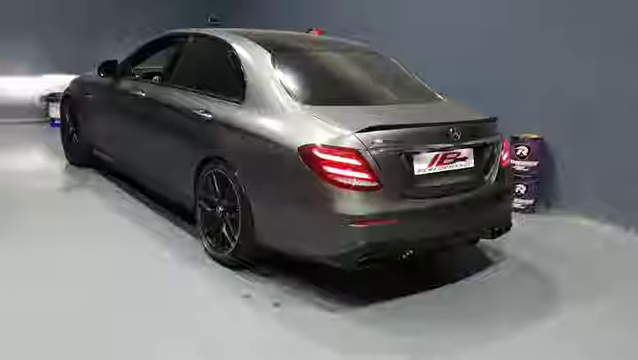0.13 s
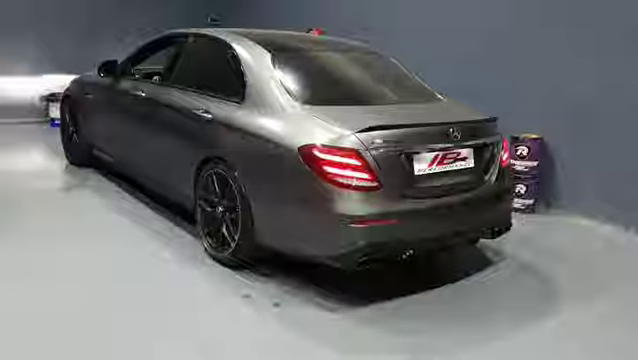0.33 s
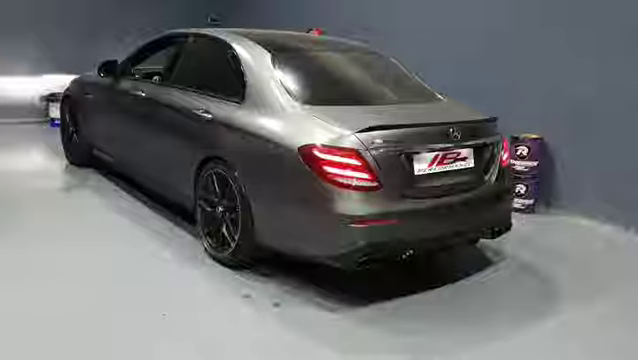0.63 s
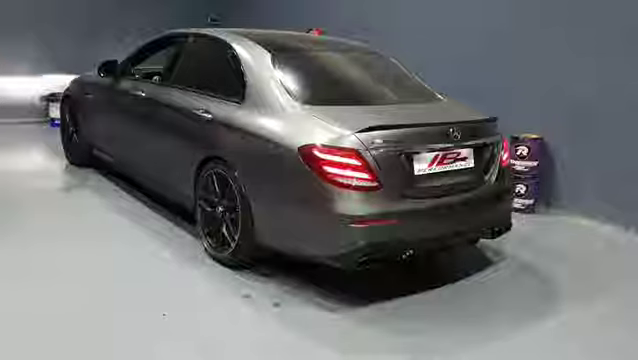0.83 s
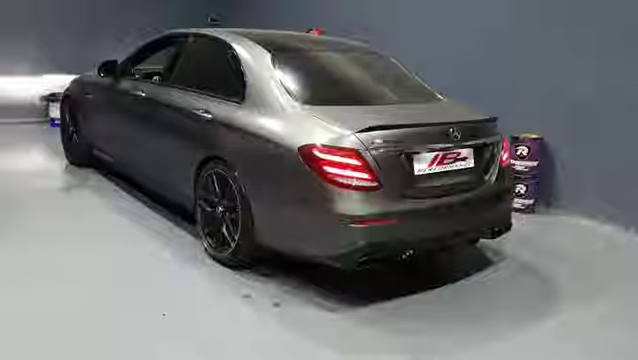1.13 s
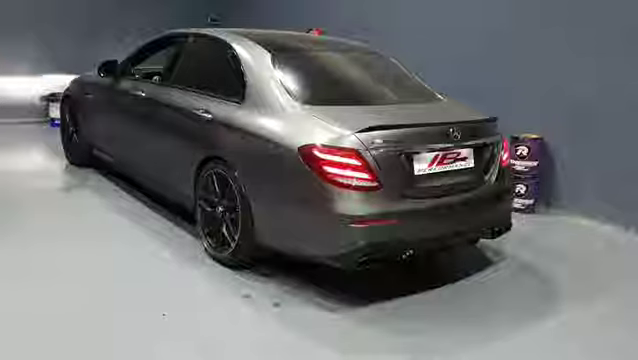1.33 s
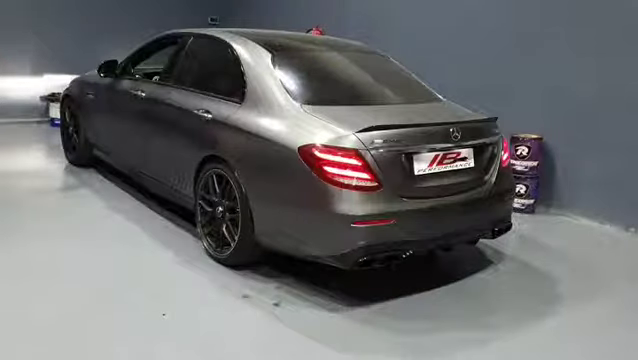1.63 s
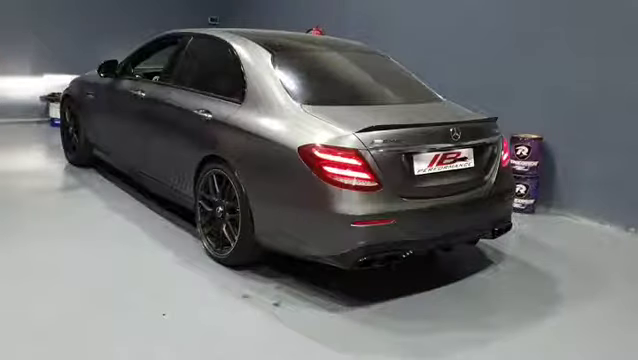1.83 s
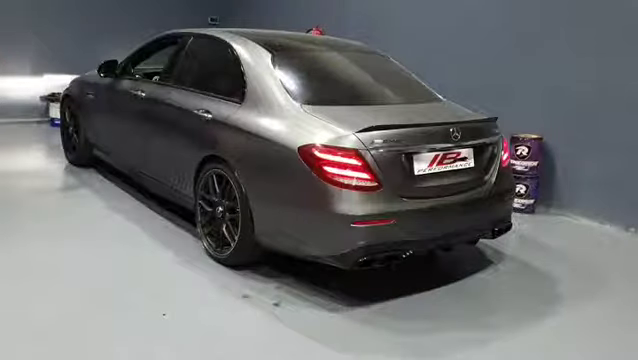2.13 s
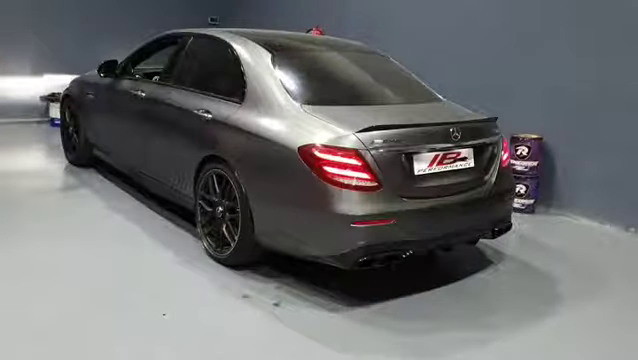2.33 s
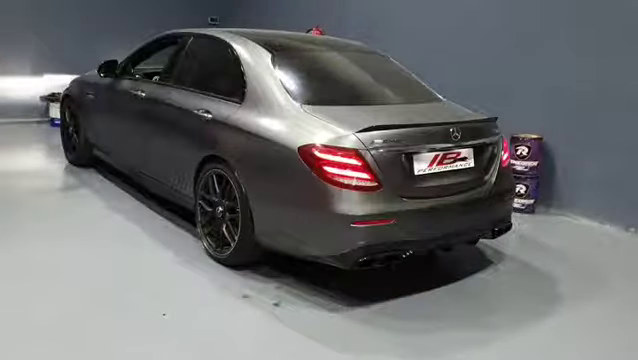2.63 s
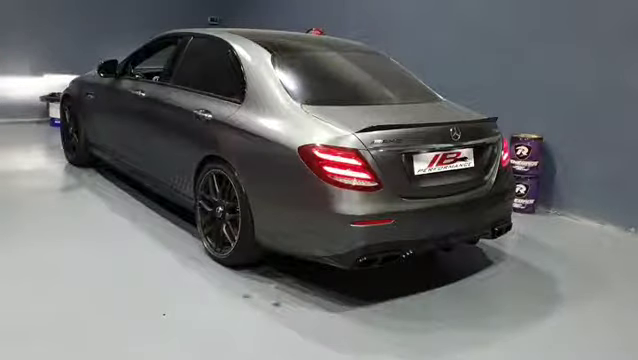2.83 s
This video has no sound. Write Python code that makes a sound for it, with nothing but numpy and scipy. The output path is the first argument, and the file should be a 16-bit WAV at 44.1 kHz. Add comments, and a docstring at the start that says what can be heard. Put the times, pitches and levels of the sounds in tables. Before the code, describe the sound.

Car exhaust settles to a low throb, roars up in one hard rev, then pops and crackles

```python
"""The exhaust of a large car in a bare workshop, heard from behind: noise gated by the firings roars and rasps
when the throttle is blipped, then short bursts pop as the revs fall. Sine waves at shaft orders give the engine's
pitch. It first settles from an earlier rev, and a gliding low note booms, swelling and sinking. Intake air hisses,
thin metal buzzes, and decaying noise tails give the workshop's answer."""
import sys
import numpy as np
from scipy import signal
from scipy.fft import rfft, irfft, next_fast_len
from scipy.io import wavfile
from scipy.ndimage import uniform_filter1d, map_coordinates

SR = 44100
rng = np.random.default_rng(int(sys.argv[2]) if len(sys.argv) > 2 else 0)


def boost(x):
    """Linear amplitude factor 10**(x/20) for a level x in decibels (scalar or array-like)."""
    u = np.asarray(x, float) / 20
    return 10 ** u


def master_out(mix):
    """Clip the mix to full scale and print it as 16-bit PCM to the path in sys.argv[1]."""
    frames = np.transpose(np.atleast_2d(mix))
    ceiling = np.clip(frames, -1, 1)
    pcm = np.round(ceiling * 32767).astype(np.int16)
    wavfile.write(sys.argv[1], SR, pcm)


N = 132300  # samples, 3 s

# Course of the engine. Each row: time in seconds, firings a second, level of the firing order in dB,
# level of the other orders in dB, share of the revving pipe colour from 0 to 1.
ENGINE_COURSE = [(0, 125, -19, -32, 0), (1.1, 68, -30, -42, 0), (1.38, 60, -36, -40, 0),
                 (1.45, 92, -19, -26, .8), (1.53, 141, -17, -21, 1), (1.61, 186, -16, -22, 1),
                 (1.7, 230, -19, -18, 1), (1.78, 268, -15, -20, 1), (1.86, 310, -17, -20, 1),
                 (1.89, 321, -17, -20, 1), (2.05, 320, -16.5, -21, 1), (2.2, 321, -17, -34, 1),
                 (2.28, 318, -30, -34, 1), (2.43, 250, -38, -30, .9), (2.7, 240, -40, -36, .9),
                 (3, 232, -44, -38, .9)]
FIRINGS_PER_TURN = 4


def unit(x):
    """Normalisation: scale to rms 1."""
    return x / np.sqrt(np.mean(x ** 2) + 1e-20)


def along(points, hz):
    """Interpolation of (Hz, value) points on a logarithmic frequency axis."""
    f, v = np.transpose(points)
    return np.interp(np.log(hz + 1), np.log(f + 1), v)


def curves(rows):
    """Linear interpolation in time: one value per sample for each column after the time."""
    s, *columns = np.transpose(rows)
    return [np.interp(np.arange(N) / SR, s, column) for column in columns]


def wobble(rate):
    """Band-limited fluctuation: a smooth random curve with rate knots a second."""
    knots = rng.standard_normal(int(N * rate / SR) + 4)
    return map_coordinates(knots, [np.arange(N) * rate / SR])


def filtered(x, response):
    """Linear filtering: the spectrum of x times a response of frequency."""
    m = next_fast_len(N + SR // 2)
    return irfft(rfft(x, m) * response(np.fft.rfftfreq(m, 1 / SR)), m)[..., :N]


def resonance_gain(hz):
    """Resonance: each pipe or room mode raises, or at 501 Hz lowers, the gain in a bell around its frequency."""
    # Pipe and room resonances. Each row: centre in Hz, width in Hz, gain at the centre in dB.
    resonances = [(148, 16, 6), (199, 20, 6), (315, 14, 10), (396, 12, 9), (501, 11, -4), (571, 18, 10),
                  (633, 60, 5), (720, 40, 7), (883, 45, 10), (1125, 90, 5), (3330, 30, 5)]
    return boost(sum(db / (1 + (2 * (hz - centre) / width) ** 2) for centre, width, db in resonances))


def coloured(x, spectrum):
    """Source and filter: x through a spectrum and the resonances, at rms 1."""
    return unit(filtered(x, lambda hz: boost(along(spectrum, hz)) * resonance_gain(hz)))


def spread(pair):
    """Interaural coherence: two unrelated versions mixed to be alike in the bass and unlike in the treble."""
    # Each row: frequency in Hz, left-right likeness from 0 to 1.
    likeness = [(60, 1), (120, .99), (380, .91), (950, .75), (2380, .5), (5980, .18), (15000, .15)]
    # Each row: frequency in Hz, left minus right in dB.
    balance = [(60, -11), (150, -1), (380, 0.0), (950, 0.5), (2380, -1), (5980, -2.5), (15000, 1.5)]

    def mid_and_side(hz):
        angle = np.arccos(np.clip(along(likeness, hz), -1, 1)) / 2
        return np.array([np.cos(angle), np.sin(angle)])

    mid, side = filtered(pair, mid_and_side)
    left_right = np.array([mid + side, mid - side])
    return filtered(left_right, lambda hz: boost(along(balance, hz) * [[.5], [-.5]]))


def room(x):
    """Reverberation: each frequency decays exponentially at its own speed, in two unrelated tails."""
    # Decay of the workshop's answer. Each row: frequency in Hz, time to fall by 60 dB in seconds.
    decay_times = [(100, 0.16), (600, 0.75), (3000, 1.29), (8000, 1.58), (15000, 0.19)]
    hz, t, cells = signal.stft(rng.standard_normal((2, 3 * SR // 2)), SR, nperseg=256)
    decay = boost(-60 * t / along(decay_times, hz)[:, None])
    tail = signal.istft(cells * decay, SR, nperseg=256)[1]
    tail = tail / np.linalg.norm(tail[0])
    delayed = np.pad(x, (500, 0))[None]  # the answer starts 500 samples late
    return signal.fftconvolve(delayed, tail, axes=1)[:, :N]


def boom():
    """Frequency and amplitude modulation: one gliding low sine swells and sinks, a little early on the left."""
    # Low note in the room's bass, swelling and sinking. Each row: time in seconds, frequency in Hz, rms level in dB.
    low_note = [(.23, 78.93, -17), (.29, 81.5, -44), (.32, 79, -18), (.38, 74.6, -25), (.41, 68.1, -15),
                (.49, 69.1, -10.5), (.58, 75.9, -22), (.61, 79.4, -27.5), (.66, 71, -13), (.71, 79.5, -24),
                (.74, 80.1, -16), (.79, 79.3, -37), (.86, 74.3, -15), (.92, 72.3, -22.5),
                (.98, 71.46, -14.5), (1.08, 69, -11), (1.17, 63.5, -20), (1.23, 63.2, -14.5),
                (1.32, 59.4, -25.5), (1.38, 59, -27), (1.43, 62.7, -8), (1.46, 71.5, -24),
                (1.49, 72.2, -10), (1.58, 70.4, -44), (1.68, 67.17, -22), (1.89, 82.2, -29),
                (2.18, 78.1, -20.5), (2.24, 69, -32.5), (2.27, 68.5, -8.5), (2.32, 66.3, -40.5),
                (2.41, 65.8, -27.5), (2.55, 86.3, -35.5), (3, 79, -38)]
    hz, db = curves(low_note)
    lead = boost(-30) * np.array([[1], [-1]])  # radians, left and right
    phase = 2 * np.pi * np.cumsum(hz) / SR + lead
    level = uniform_filter1d(boost(db), size=600)
    return np.sqrt(2) * level * np.sin(phase)


def intake():
    """Turbulence: air rushing in is a smooth, ungated hiss."""
    # Each row: time in seconds, rms level in dB.
    rush = [(1.27, -114), (1.31, -61), (1.4, -50.5), (1.54, -38.5), (1.68, -46), (1.9, -79), (2, -101)]
    # Each row: frequency in Hz, relative spectral density in dB.
    air_colour = [(8000, -66), (10500, -25), (11500, -15.5), (14500, -18.5), (15600, -36), (16000, -70)]
    return boost(curves(rush)[0]) * coloured(rng.standard_normal((2, N)), air_colour)


def pops():
    """Impulsive combustion: unburnt fuel fires in the pipe, a sharp crack over a short hollow thud."""
    # Each row: time in seconds, crack level before its colour in dB, thud peak level in dB.
    bangs = [(2.138, -17.5, -8.5), (2.1834, -19, -8.5), (2.2114, -34, -6), (2.2448, -4.5, -12),
             (2.2584, -8.5, -15.5), (2.2774, -34, -7), (2.356, -42, -8), (2.378, -3, -29.5),
             (2.4094, -16, -7.5)]
    # Colour of the cracks. Each row: frequency in Hz, gain in dB.
    crack_colour = [(180, -28), (300, -6), (1500, 1), (1900, -9), (2500, -2), (3560, 6.5), (4600, -12),
                    (6000, -9), (10400, -20.5), (16000, -31)]
    crack_t60, thud_t60 = .065, .045  # s
    thud_hz, bright_over_db = 610, -12
    crack, thud = np.zeros(N + SR), np.zeros(N + SR)
    t = np.arange(SR // 8) / SR
    for s, crack_db, thud_db in bangs:
        here = slice(round(s * SR), round(s * SR) + len(t))
        smoothing = 1 if crack_db > bright_over_db else 5  # weaker pops lose their treble
        grit = uniform_filter1d(rng.standard_normal(len(t)), size=smoothing)
        crack[here] += boost(crack_db - 60 * t / crack_t60) * unit(grit)
        hz = thud_hz * rng.uniform(0.898, 1.048)
        thud[here] += boost(thud_db - 60 * t / thud_t60) * np.sin(2 * np.pi * hz * t)
    return filtered(crack[:N], lambda hz: boost(along(crack_colour, hz))) + thud[:N]


def orders():
    """Harmonic analysis of rotation: unsteady sines at shaft orders; resonances reshape the weaker ones."""
    # The weaker orders. Each row: cycles per shaft turn, relative level in dB.
    weaker_orders = [(1, -16), (2, -13), (2.5, -8), (5, -9), (6, -8), (8, -10), (12, -12)]
    firing_hz, firing_db, others_db, _ = curves(ENGINE_COURSE)
    turns = np.cumsum(firing_hz) / SR / FIRINGS_PER_TURN

    def tone(order, rough_db):
        level = boost(rough_db * wobble(14))
        return level * np.sin(2 * np.pi * order * turns + rough_db / 8 * wobble(14))

    others = boost(others_db) * sum(boost(db) * tone(order, 2.3) for order, db in weaker_orders)
    return boost(firing_db) * tone(FIRINGS_PER_TURN, .9) + filtered(others, resonance_gain)


def firing_puffs(count):
    """Amplitude modulation: each firing opens a decaying gate of its own uneven strength."""
    uneven_db, gate_depth = 1.2, .35
    strengths = boost(uneven_db * rng.standard_normal(int(count[-1]) + 2))
    gate = 1 - gate_depth + gate_depth * np.exp(-4 * (count % 1))
    return strengths[count.astype(int)] * gate


def gas(puff, spectrum):
    """Modulated turbulence: two versions of noise gated by the puffs, coloured and slightly fluttering."""
    flutter = boost(.6 * wobble(10.8))
    return flutter * coloured(puff * rng.standard_normal((2, N)), spectrum)


def metal_buzz(puff):
    """Narrow-band radiation: thin metal buzzes as puffed noise in a few close bands, with a fast tremor."""
    # Each row: time in seconds, level in dB.
    buzz_level = [(1.42, -60), (1.52, -29), (1.64, -25), (1.7, -19), (1.93, -20.5), (1.97, -40), (2.1, -90)]
    # Each row: frequency in Hz, relative spectral density in dB.
    tin_colour = [(2900, -29), (3250, -7.5), (3340, 4.5), (3450, -1), (3570, 8), (3800, -5), (4150, -40)]
    return boost(curves(buzz_level)[0] + 1.4 * wobble(30)) * gas(puff, tin_colour)


def exhaust():
    """Pulsed jet noise: roar, rasp and hiss gated by each firing, with metal buzz and smooth intake air."""
    # Each row: time in seconds, level of roar in dB, of rasp in dB, of hiss in dB.
    gas_levels = [(.2, -22.5, -32, -43.5), (.38, -19.5, -32, -45.5), (.6, -24.5, -37.5, -50),
                  (.84, -24.5, -41, -55), (1.13, -30, -42.5, -57), (1.37, -29.5, -41, -50.5),
                  (1.4, -26.5, -34, -46.5), (1.46, -21.5, -22.5, -36.5), (1.56, -11, -19.5, -31),
                  (1.68, -12, -17.5, -30.5), (1.79, -14, -19, -34.5), (1.92, -13, -23, -32),
                  (1.97, -16, -25, -38.5), (2.08, -19, -33, -43), (2.22, -20.5, -27, -42),
                  (2.36, -18.5, -25.5, -33.5), (2.374, -22, -27.5, -40), (2.385, -25.5, -24, -33),
                  (2.44, -22.5, -39, -25.5), (2.55, -23, -32.5, -32.5), (2.72, -26, -37, -47),
                  (3, -29, -35.5, -48)]
    # Roar of the revving pipe, roar off the throttle, rasp and hiss.
    # Each row of these four: frequency in Hz, relative spectral density in dB.
    revving_colour = [(18, -51), (30, -15), (65, -6), (284, -4.5), (322, -6.5), (419, -6.5), (574, -3),
                      (774, -13.5), (1430, -19.5), (2000, -26), (2600, -19.5), (4400, -120)]
    slack_colour = [(25, -32), (45, 5.5), (110, -5.5), (170, -15.5), (250, -6.5), (390, -10.5), (586, -15),
                    (771, -24), (1430, -31.5), (1760, -58.5), (2000, -24), (2600, -64), (4400, -120)]
    rasp_colour = [(710, -37), (1200, -2), (1470, -1), (1890, -12), (2580, -3), (2990, -7), (3450, -6.5),
                   (4200, -13.5), (5000, -21.5), (6500, -78), (11000, -120)]
    hiss_colour = [(2350, -57), (4000, -18), (4870, 2.5), (6180, 6.5), (9720, -8.5), (10300, -14),
                   (12300, -15), (16000, -39)]
    firing_hz, _, _, share = curves(ENGINE_COURSE)
    share = np.clip(share, 0, 1)
    puff = firing_puffs(np.cumsum(firing_hz) / SR)
    roar_db, rasp_db, hiss_db = curves(gas_levels)
    # square roots keep the power of the blend steady
    roar = np.sqrt(share) * gas(puff, revving_colour) + np.sqrt(1 - share) * gas(puff, slack_colour)
    rasp, hiss = gas(puff, rasp_colour), gas(puff, hiss_colour)
    jet = boost(roar_db) * roar + boost(rasp_db) * rasp + boost(hiss_db) * hiss
    return jet + intake() + metal_buzz(puff)


def scene():
    """Superposition: boom, engine orders, pops and exhaust with the room's answer."""
    tones, bangs, blown = orders(), pops(), exhaust()
    wet = room(boost(-11.0) * blown[0] + boost(-18) * tones + boost(-2) * bangs)
    bang_sides = boost(-3 * np.array([[.5], [-.5]]))  # left 3 dB below right
    return boom() + tones + bangs * bang_sides + spread(blown + wet)


def low_pass(x):
    """Removes everything above the highest recorded frequency."""
    return signal.sosfilt(signal.butter(12, 16540, fs=SR, output="sos"), x)


def record(dry):
    """High-pass filtering and saturation: the microphone drops the lowest bass, and peaks are softly clipped."""
    start_s, low_cut_hz, clip_at = .2215, 40, 1.0
    heard = filtered(dry, lambda hz: 1 / (1 + (low_cut_hz / (hz + 1)) ** 6))
    heard = heard * (np.arange(N) > start_s * SR)  # silence, then the sound cuts in
    finished = heard / (1 + np.abs(heard / clip_at) ** 8) ** (1 / 8)
    return low_pass(finished)


dry = scene()
out = record(dry)
master_out(out)
```